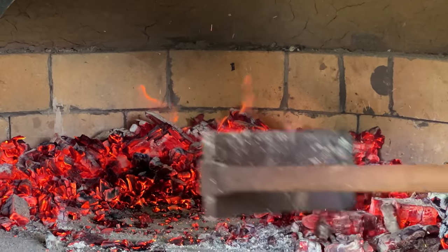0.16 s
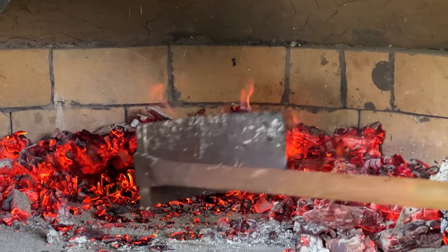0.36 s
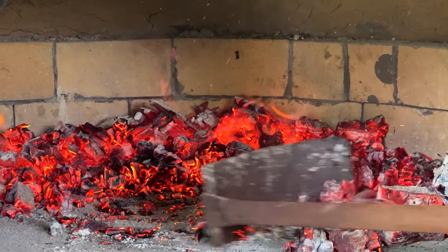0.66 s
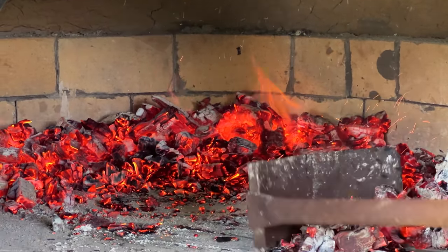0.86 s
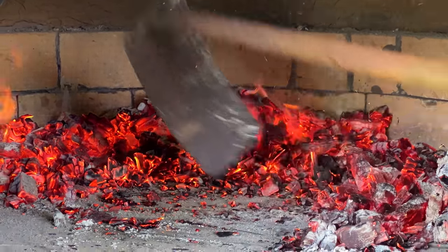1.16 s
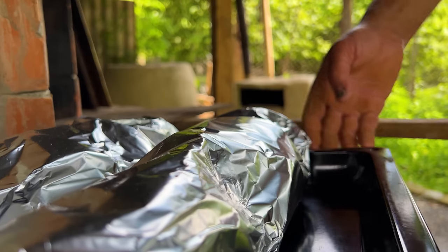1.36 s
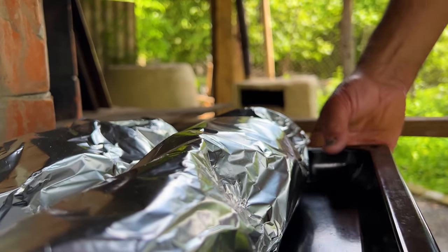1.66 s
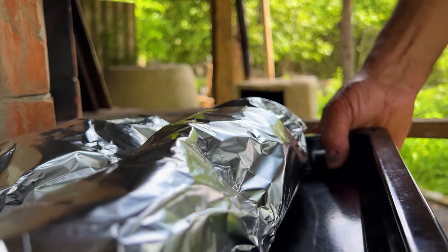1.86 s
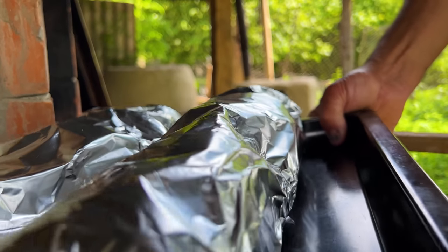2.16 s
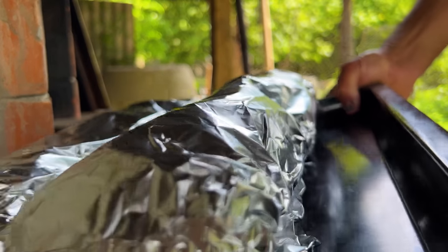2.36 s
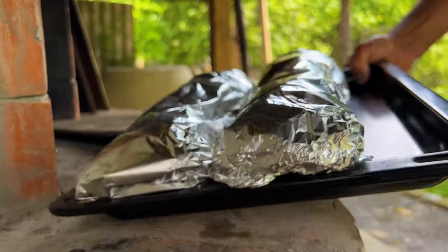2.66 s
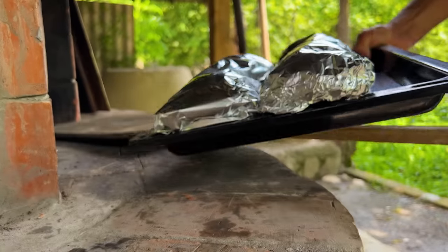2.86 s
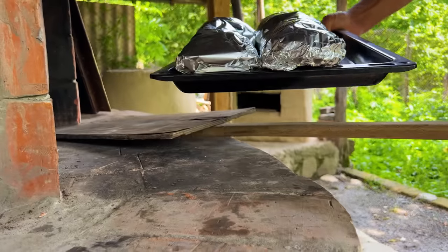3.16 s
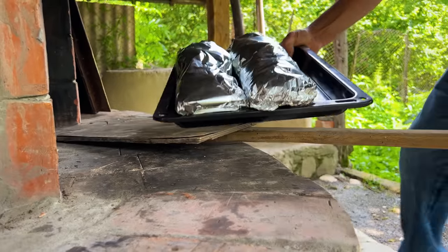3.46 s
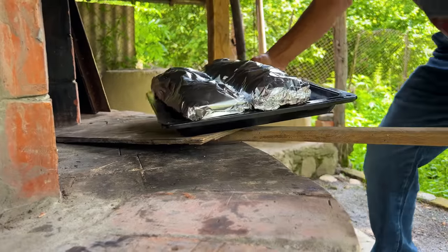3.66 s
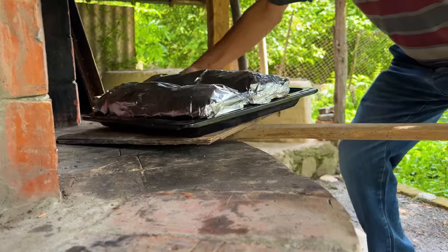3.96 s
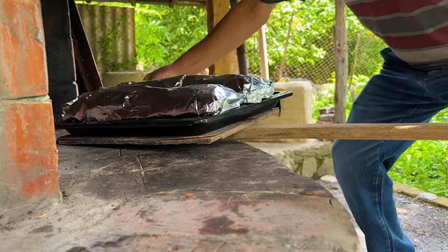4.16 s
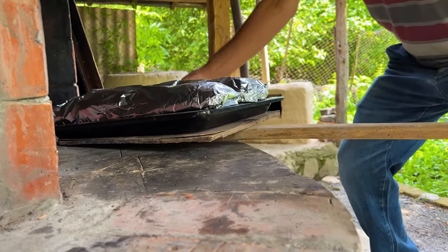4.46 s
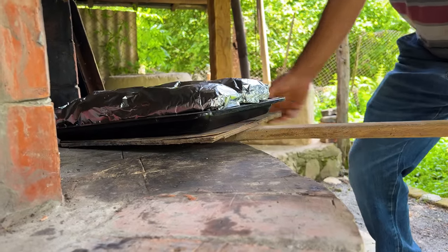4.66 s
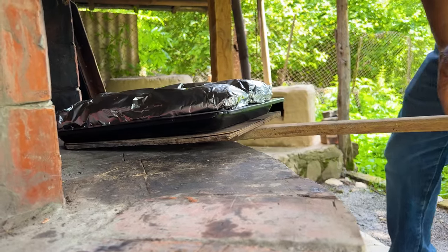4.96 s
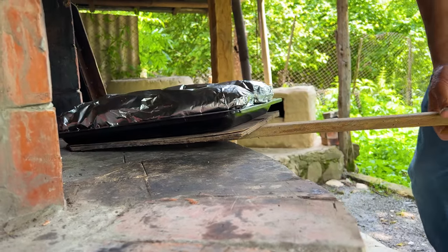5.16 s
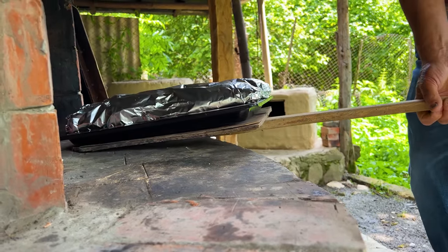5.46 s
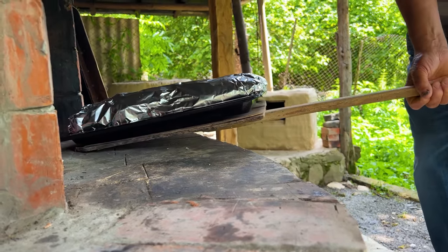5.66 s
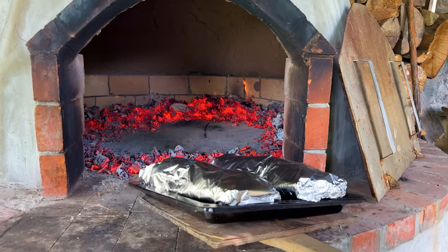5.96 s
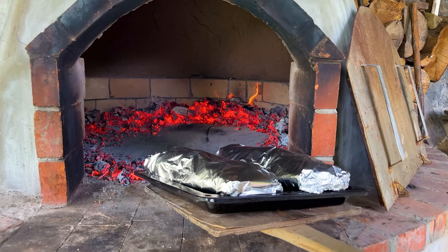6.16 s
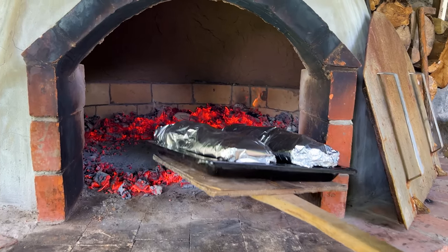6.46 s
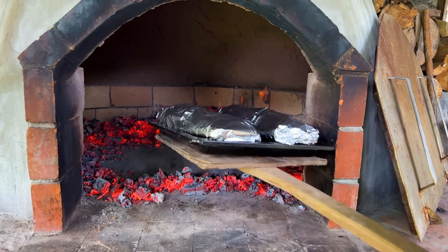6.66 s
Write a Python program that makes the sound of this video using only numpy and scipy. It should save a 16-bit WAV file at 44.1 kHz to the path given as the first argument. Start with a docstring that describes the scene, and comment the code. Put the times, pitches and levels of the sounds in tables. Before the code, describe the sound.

A steel rake scrapes and clinks through embers on the brick floor of an outdoor oven. Foil crinkles lightly, then a loaded baking tray clunks down, drags and grinds over gritty stone with sharp clicks. Softer knocks follow, and a wooden peel slides in a few short strokes. Faint birds chirp over a quiet garden hush, with a little low handling rumble on the microphone.

```python
"""A garden with a wood-fired oven: a steel rake scrapes the bricks, a baking tray is set down and dragged,
then tray and peel grind over gritty stone. Friction and impact excite the normal modes of each body.
Embers and foil tick in short damped bursts, and the load knocks dully on wood and stone.
Birdsong and one short squeak scatter among the trees over a quiet hush. Moving air pushes
the microphone below the range of hearing, and a low rumble swells with handling bumps."""
import sys
import numpy as np
from scipy import signal
from scipy.fft import rfft, irfft, next_fast_len
from scipy.io import wavfile
from scipy.ndimage import uniform_filter1d

SR = 44100
rng = np.random.default_rng(int(sys.argv[2]) if len(sys.argv) > 2 else 0)


def store_wav(level_fs):
    """Save 16-bit WAV to argv[1]."""
    pcm = np.round(np.clip(np.atleast_2d(level_fs), -1, 1) * 32767)
    wavfile.write(sys.argv[1], SR, pcm.T.astype(np.int16))


N = 300321
FFT_SIZE = next_fast_len(N + SR)
TIME_S = np.arange(N) / SR
FREQ_HZ = np.maximum(np.arange(FFT_SIZE // 2 + 1) * SR / FFT_SIZE, 1.)

# Friction strokes, in relative levels: start_s, length_s, first_db, last_db, lead_s, bass_db, treble_db
RAKE_STROKES = [(.53, 0.47, -41.5, -63, 0.026, -17.5, 1), (.69, 0.14, -33, -39, 0.055, -14.5, -2),
                (.96, 0.32, -53.5, -56, 0.058, -17, -14.5)]
TRAY_STROKES = [(1.961, 0.084, -24, -47.5, 0.0082, 6, -72), (2.03, 0.16, -43.5, -48.5, .02, -1, -19.5),
                (2.23, 0.086, -29, -37.5, 0.067, 4.5, -31.5), (2.335, .16, -32.5, -28.5, 0.079, 1, -16.5)]
PEEL_STROKES = [(4.79, 0.23, -40.5, -35, 0.29, -6, -44), (5.14, 0.29, -39.5, -40, 0.13, -6.5, -40),
                (5.52, 0.19, -40, -48, 0.25, -14, -29.5), (5.76, 0.26, -51, -56, 0.11, -14, -68)]
GRIT_STROKES = [(0, 0.094, -37.5, -37.5, .01, -20, -15), (.14, 0.24, -49, -66.5, .02, -12.5, -9),
                (1.2, .15, -50, -51, 0.042, -2, -24), (1.4, 0.22, -59, -55.5, 0.055, -1.5, -12),
                (1.74, 0.077, -36, -45.5, 0.037, 0, -32.5), (1.85, 0.1, -56, -51, .03, -8.5, -13),
                (2.87, .06, -50, -39, .07, -13, -16), (2.94, .46, -29.5, -29.5, .05, -13, -19),
                (3.42, 0.11, -35.5, -41, 0.052, -4, -19.5), (3.6, 0.47, -51.5, -47, .03, 3, -37),
                (4.1, 0.18, -38.5, -38, 0.24, -7, -25), (4.33, 0.074, -54, -51, .05, -14, -12.5)]
# Catches that make the friction jump: time_s, jump_db
EDGE_CATCHES = [(0.528, 11), (0.611, 10), (1.203, 10.5), (1.33, 12.5), (1.738, 5), (1.777, 9.5), (2.234, 7),
                (2.259, 7.5), (2.284, 11.5), (2.351, 3.5), (2.373, 13), (2.408, 8), (2.44, 13), (2.472, 10),
                (2.509, 14), (3.054, 11), (3.265, -3.5), (3.382, -0.5), (3.538, 7.5), (4.14, -4),
                (4.374, 8), (5.201, 1.5), (5.33, 3.5), (5.702, 7), (5.729, 16), (5.75, 0), (6, -3)]
# Normal modes (grit rings briefly all over the middle range): pitch_hz, level_db, t60_s
RAKE_MODES = [(705, -9, .15), (791, -8, .1), (1050, -10, .2), (1200, -9, .2), (1710, -4, .18),
              (2094, -8, .6), (2175, -5, .22), (2585, -6, .13), (3316, -6, .45), (3413, -7, .3),
              (3688, -7, .25), (3795, -10, .1), (4118, -10, .2), (4305, -11, .15), (4425, -9, .15),
              (4875, -5, .3), (5150, -12, .2), (5750, -11, .15), (6051, -10, .12), (6770, -9, .18),
              (7410, -13, .15), (7900, -15, .15), (8430, -15, .15), (9280, -14, .16), (9640, -16, .18),
              (10250, -15, .1), (10750, -17, .12), (11950, -16, .1), (13420, -19, .1)]
PEEL_MODES = [(700, -14, .03), (1250, -6, .015), (1480, -2, .012), (1650, 0, .012), (1880, -4, .2),
              (2040, 2, .08), (2600, -9, .012), (3800, -14, .005), (4340, -11, .015), (8500, -29, .003)]
GRIT_MODES = [(hz, -6 * np.log2(hz / 3100) ** 2, 45 / hz) for hz in 600 * 2 ** (np.arange(19) / 6)]
# Resonances of the tray: pitch_hz, level_db
TRAY_RESONANCES = [(160, 6.5), (215, -1), (253, 4.5), (405, 3), (549, 5), (610, 10.5), (662, 7), (736, 7.5),
                   (875, 1.5), (1165, -11), (1610, 6), (2095, -12), (2200, -16), (2300, 4), (2700, 6),
                   (3300, 1), (3780, -9), (4285, -14), (4730, -14.5), (5005, -44)]
# Blows on steel: start_s, peak_db, centre_hz, width_octaves
RAKE_IMPACTS = [(.16, -44.5, 4030, 0.051), (.531, -27, 2730, 0.28), (.533, -38, 4350, 0.089),
                (.615, -37, 4260, 0.044), (.618, -38, 2590, .05), (.705, -30, 2590, .05),
                (.687, -26.5, 4930, 0.16), (.69, -35, 795, 0.38), (.86, -43, 3330, 0.037),
                (.86, -38, 4940, 0.1), (.947, -38.5, 2109, 0.028), (.947, -42.5, 3430, 0.14)]
TRAY_IMPACTS = [(1.96, -16.5, 736, 0.28), (1.962, -25.5, 544, 0.045), (2.5, -31.5, 160, 0.059),
                (3.88, -52, 420, .15), (4.07, -40, 686, 0.18), (4.125, -35.5, 690, .15),
                (4.145, -31, 2230, 0.039), (4.17, -54.5, 336, 0.074), (4.215, -31.5, 2200, 0.026),
                (4.248, -27.5, 2200, 0.028)]
# Ticks of embers, foil and grit: start_s, peak_db, pitch_hz, snap_db
SHARP_TICKS = [(0.3705, -38, 3900, -45), (1.0653, -63, 2060, -41), (1.2544, -26, 910, -64),
               (1.404, -35.5, 1920, -60), (1.49, -36.5, 1960, -45), (1.568, -39, 4500, -43),
               (1.6423, -38, 3700, -62), (1.6792, -32, 3470, -55), (1.885, -39, 1390, -57),
               (1.9595, -13, 1570, -38), (2.069, -34.5, 3900, -32.5), (2.61, -43, 1840, -82),
               (2.8654, -44, 1080, -58), (2.9198, -22, 2250, -48), (2.9387, -16, 2170, -42),
               (2.9522, -14.5, 1890, -45), (2.995, -19, 3830, -45), (3.0467, -13, 1040, -20),
               (3.0579, -19, 3280, -25), (3.139, -15.5, 3540, -34), (3.1658, -10.5, 2630, -33),
               (3.3383, -20, 3270, -45), (3.3882, -19.5, 1980, -42), (3.4698, -25, 2740, -30),
               (3.5045, -27, 1970, -43), (3.5215, -28, 990, -56), (3.5905, -32.5, 1790, -60),
               (3.6306, -37, 1350, -69), (3.6906, -58, 1060, -64), (3.745, -44, 3600, -58),
               (3.7533, -30, 1230, -66), (3.8, -35, 1700, -66), (3.878, -33, 1030, -66),
               (3.9734, -29.5, 2800, -39.5), (4.817, -30, 1680, -34.5), (4.848, -33, 1600, -55),
               (4.8745, -27.5, 1600, -26.5), (4.9687, -35, 1610, -41), (5.1541, -32.5, 1600, -52),
               (5.28, -36, 1950, -60), (5.6978, -34, 2410, -37), (5.728, -30, 1980, -51),
               (5.74, -35, 3580, -53), (5.752, -31, 2600, -52), (5.89, -46.5, 4130, -59),
               (6.003, -42, 2900, -70), (5.9371, -37, 2920, -62), (5.9594, -68, 6000, -38.5),
               (6.3747, -39, 2800, -37.5), (6.526, -61, 4460, -46.5)]
# Knocks of the load on wood and stone: start_s, peak_db, pitch_hz
DULL_KNOCKS = [(.765, -40, 218), (1.255, -35.5, 295), (1.35, -31, 393), (1.741, -35.5, 82.5),
               (1.779, -29, 368), (1.956, -25.5, 137), (2.499, -30, 160), (3.447, -45, 78.1),
               (3.548, -37, 79), (3.597, -35, 164), (3.884, -43, 163)]
# Spells of small ticks: start_s, length_s, ticks_per_s, typical_peak_db
CRINKLE_SPELLS = [(0.205, .25, 8.7, -50), (1.416, .28, 25, -49), (3.578, .45, 20, -49)]
# Bird notes and one short falling squeak:
# start_s, length_s, first_hz, last_hz, level_db, bend_exponent, flutter_share
WHISTLES = [(.12, .25, 2500, 3130, -55, .5, .03), (.17, .22, 1960, 2040, -63, 1, .03),
            (.25, .2, 3950, 4030, -65, 1, .02), (1.5, .22, 3650, 3860, -62, .25, .01),
            (1.835, .05, 2980, 2580, -47, 1, .01), (3.75, .22, 2330, 2980, -52, .6, .025),
            (4.57, .07, 3500, 3900, -65, .9, .01), (4.62, .16, 3900, 3740, -64, .9, .01),
            (4.87, .15, 2760, 2660, -58, .9, .01), (5.03, .12, 2700, 3450, -48, .9, .012),
            (5.54, .3, 2070, 1930, -62, 2, .012), (5.8, .2, 1900, 1880, -64, 1, .012),
            (5.98, .2, 1880, 1870, -71, 1, .01), (6.01, .19, 3810, 3830, -67, 1, .006),
            (6.16, .165, 3830, 5800, -69, 1.15, .016), (6.19, .12, 2000, 2900, -68, 1.4, .015),
            (6.29, .15, 2900, 2480, -61, .6, .02), (6.43, .085, 2550, 3480, -60, .8, .016),
            (6.5, .05, 3430, 3400, -66, 1, .016)]
# Strength of the air's slow push and of a low rumble with handling bumps: time_s, push_db, rumble_db
PUSH_AND_RUMBLE_LEVELS = [(0.0, -33, -63), (0.97, -35.5, -76), (1.86, -33, -43.5), (2.12, -38, -52.5),
                          (5.29, -33.5, -70.5), (5.63, -45.5, -57), (5.84, -25.5, -65), (6.1, -24.5, -59),
                          (6.2, -28.5, -63.5), (6.64, -25, -67), (6.81, -35.5, -51.5)]
# Strength of the garden hush: time_s, level_db
HUSH_LEVELS = [(0, -67.5), (1.4, -61.5), (2.75, -62), (4.5, -64.5), (6.1, -62.5), (6.81, -63)]
# Spectra of the bare contact, the air's slow push, the rumble and the hush: frequency_hz, density_db
CONTACT_SPECTRUM = [(59, -67.5), (100, -10.5), (287, -18.5), (386, -10.5), (530, -17.5), (601, -8.5),
                    (825, -7.5), (1060, -5), (2580, 0), (4020, -6), (15500, -62)]
PUSH_SPECTRUM = [(3, 9.5), (6, 9.5), (10, 18.5), (16, 19), (24, -0.5), (40, -15), (80, -66.5)]
RUMBLE_SPECTRUM = [(15, -7), (28, 2.5), (45, -1.5), (70, -9), (110, -17), (200, -53)]
HUSH_SPECTRUM = [(40, -4.5), (100, 2), (200, 0), (1000, -13), (2000, -17.5), (3500, -21), (5500, -28.5),
                 (9000, -43.5), (15500, -58)]

TICK_T60_S, KNOCK_T60_S = .019, .16


def rake_scrape():
    """Contact damping: pressed on the bricks, the steel keeps under half of its free ring time."""
    pressed_modes = [(hz, db, .45 * t60) for hz, db, t60 in RAKE_MODES]
    return friction(RAKE_STROKES, pressed_modes, fall_db_per_s=93, bare_db=-2, grain_db=3.5,
                    stutter_db=-.5, patchy_db=4, shift_hz=25.76, drift_share=.0005)


def tray_drag():
    """Plate vibration: sliding friction drives the bending modes of the loaded tray."""
    return friction(TRAY_STROKES, loaded_tray_modes(), fall_db_per_s=359, bare_db=-2, grain_db=3,
                    stutter_db=-1, patchy_db=3.5, shift_hz=16.88, drift_share=.008)


def loaded_tray_modes():
    """Frequency-dependent damping: under the load, higher modes decay sooner."""
    return [(hz, db, min(.18 * (600 / hz) ** 1.4, .35)) for hz, db in TRAY_RESONANCES]


def peel_slide():
    """Damped resonance: stone rubs the peel, whose mostly short-lived modes give broad peaks."""
    return friction(PEEL_STROKES, PEEL_MODES, fall_db_per_s=153, bare_db=-2, grain_db=3.5,
                    stutter_db=1.5, patchy_db=2, shift_hz=18, drift_share=.01)


def grit_grind():
    """Roughness noise: on loose grit the bare contact outweighs the brief ringing."""
    return friction(GRIT_STROKES, GRIT_MODES, fall_db_per_s=314, bare_db=7.5, grain_db=3.5,
                    stutter_db=2, patchy_db=5.5, shift_hz=30.38, drift_share=.05)


def friction(strokes, modes, fall_db_per_s, bare_db, grain_db, stutter_db, patchy_db, shift_hz,
             drift_share):
    """Forced vibration: rubbing drives modes whose strength and pitch vary as the contact shifts."""
    pressure, bass_db, treble_db = stroke_envelopes(strokes, fall_db_per_s)
    bare_force, modal_force = contact_forces(grain_db, stutter_db) * pressure
    out = undb(bare_db) * contact_noise(bare_force, bass_db, treble_db)
    force_slope = signal.lfilter([.5, 0, -.5], 1, modal_force)
    span = slice(max(int((strokes[0][0] - .3) * SR), 0), min(int((strokes[-1][0] + .7) * SR), N))
    count = span.stop - span.start
    total_power = sum(undb(db) ** 2 / t60 for _, db, t60 in modes) * np.log(1000) / SR
    usual_bass_db, usual_treble_db = np.median(np.array(strokes)[:, -2:], axis=0)
    for hz, db, t60 in modes:
        # Low modes follow the stroke's bass, high modes its treble.
        tilt_db = (hz < 1000) * (bass_db - usual_bass_db) + (hz > 4500) * (treble_db - usual_treble_db)
        drive = force_slope[span] * undb(db + tilt_db[span] + patchy_db * wander(shift_hz, count))
        pitch_hz = hz * (1 + drift_share * wander(shift_hz / 2, count))
        phasor = np.exp(2j * np.pi * np.cumsum(pitch_hz) / SR)
        # A one-pole low-pass in a frame that turns with the mode acts as a resonator.
        pole = decay(1 / SR, t60)
        ring = (signal.lfilter([1 - pole], [1, -pole], drive * phasor.conj()) * phasor).imag
        out[span] += 2 * ring / np.sin(2 * np.pi * hz / SR) / np.sqrt(total_power)
    return out


def stroke_envelopes(strokes, fall_db_per_s, swell_db=30):
    """Power addition: strokes swell, hold a slope and die away; the loudest sets bass and treble."""
    total_power, bass, treble = 1e-14, 0, 0
    for start_s, length_s, first_db, last_db, lead_s, bass_db, treble_db in strokes:
        level_db = np.interp(TIME_S, [start_s, start_s + length_s], [first_db, last_db])
        level_db -= swell_db * np.maximum(start_s - TIME_S, 0) / lead_s
        level_db -= fall_db_per_s * np.maximum(TIME_S - start_s - length_s, 0)
        power = undb(level_db) ** 2
        total_power += power
        bass += power * bass_db
        treble += power * treble_db
    return np.sqrt(total_power), bass / total_power, treble / total_power


def contact_forces(grain_db, stutter_db, catch_rise_s=.004, catch_t60_s=.094):
    """Rough contact: uneven grains drive hiss and ringing; pressure stutters and jumps at catches."""
    jump = 1
    for time_s, jump_db in EDGE_CATCHES:
        rise = np.clip((TIME_S - time_s) / catch_rise_s + .5, 0, 1)
        jump += rise * undb(jump_db) * decay(np.maximum(TIME_S - time_s, 0), catch_t60_s)
    grains = rng.standard_normal((2, N)) * undb(grain_db * np.minimum(rng.exponential(size=N), 6))
    return jump * unit(grains * undb(stutter_db * wander(70)))


def contact_noise(force, bass_db, treble_db):
    """Direct radiation: the bare contact is heard as broadband noise in three bands."""
    spectrum = minimum_phase(CONTACT_SPECTRUM)
    lowpass = 1 / (1 + 1j * FREQ_HZ / 800) ** 2
    highpass = 1 / (1 + 4500 / (1j * FREQ_HZ)) ** 2
    low_cut = 1 / (1 + 170 / (1j * FREQ_HZ)) ** 2
    bass = filtered(force * undb(bass_db), unit(spectrum * lowpass * low_cut))
    middle = filtered(force, unit(spectrum * (1 - lowpass) * (1 - highpass)))
    treble = filtered(force * undb(treble_db), unit(spectrum * highpass))
    return bass + middle + treble


def steel_impacts(impacts, modes, rise_s=.001):
    """Free vibration: each blow favours the modes near its centre frequency, which then decay."""
    hz, mode_db, t60 = np.transpose(modes)[:, :, None]
    t, out = TIME_S[:SR], np.zeros(N)
    rings = undb(mode_db) / t60 * decay(t, t60) * np.sin(2 * np.pi * hz * t) * np.minimum(t / rise_s, 1)
    for start_s, peak_db, centre_hz, width_octaves in impacts:
        chance_db = 1.5 * rng.standard_normal(len(modes))
        rolloff_db = 6 * (np.log2(hz[:, 0] / centre_hz) / width_octaves) ** 2
        clang = undb(chance_db - rolloff_db) @ rings
        onset = int(start_s * SR)
        out[onset:onset + SR] += undb(peak_db) * clang / np.abs(clang).max()
    return out


def bursts(events, t60_s):
    """Damped transients: a tick or knock is a band of decaying noise, with a treble snap if listed."""
    t = TIME_S[:8192]
    out = np.zeros(N + len(t))
    for start_s, peak_db, hz, *snap_db in events:
        pulse = (rng.standard_normal(len(t)) + 4 * (t == 0)) * decay(t, t60_s)
        body = signal.lfilter(*signal.butter(2, [hz / 1.4, hz * 1.4], "bandpass", fs=SR), pulse)
        snap = signal.lfilter(*signal.butter(1, [4500, 14000], "bandpass", fs=SR), pulse)
        onset = int(start_s * SR)
        out[onset:onset + len(t)] += undb(peak_db) * body / np.abs(body).max()
        out[onset:onset + len(t)] += undb(snap_db).sum() * snap / np.abs(snap).max()
    return out[:N]


def crinkles(centre_hz=2210, spread_db=4, snap_db=-23, candidates=40):
    """A random point process: small ticks fall at chance moments within each spell."""
    ticks = []
    for start_s, length_s, ticks_per_s, typical_db in CRINKLE_SPELLS:
        delays_s = candidates * rng.random(candidates) / ticks_per_s
        peaks_db = typical_db + spread_db * rng.standard_normal(candidates)
        pitches_hz = centre_hz * 1.5 ** np.clip(rng.standard_normal(candidates), -2, 2)
        for delay_s, peak_db, hz in zip(delays_s, peaks_db, pitches_hz):
            if delay_s < length_s:
                ticks.append((start_s + delay_s, peak_db, hz, peak_db + snap_db))
    return bursts(ticks, TICK_T60_S)


def birds_and_squeak(fade_s=.02):
    """Frequency modulation: fast flutter makes gliding whistles hoarse; the trees smear them."""
    out, flutter = 0, wander(700)
    for start_s, length_s, first_hz, last_hz, level_db, bend, flutter_share in WHISTLES:
        age_s = TIME_S - start_s
        fade = np.clip(np.minimum(age_s, length_s - age_s) / fade_s, 0, 1)
        glide = np.clip(age_s / length_s, 0, 1) ** bend  # a bend under 1 slides early, over 1 late
        pitch_hz = (first_hz + (last_hz - first_hz) * glide) * (1 + flutter_share * flutter)
        out += 2 ** .5 * fade * undb(level_db) * np.sin(2 * np.pi * np.cumsum(pitch_hz) / SR)
    return filtered(out, reverberation(t60_s=.3, direct_db=-4))


def push_and_rumble():
    """Infrasound: moving air pushes the microphone, beneath a low rumble with handling bumps."""
    time_s, push_db, rumble_db = np.transpose(PUSH_AND_RUMBLE_LEVELS)
    push = unit(filtered(rng.standard_normal(N), minimum_phase(PUSH_SPECTRUM)))
    push /= np.sqrt(uniform_filter1d(push ** 2, size=SR // 4) + .96)  # evens out chance swells
    push *= undb(np.interp(TIME_S, time_s, push_db))
    rumble = unit(filtered(rng.standard_normal(N), minimum_phase(RUMBLE_SPECTRUM)))
    return push + undb(np.interp(TIME_S, time_s, rumble_db)) * rumble


def garden_hush():
    """Ambient noise: a quiet, dark hush whose uneven amplitude gives a faint crackle."""
    crackle = rng.standard_normal(N) * undb(2.6 * rng.exponential(size=N) + 1.7 * wander(8.8))
    level_db = np.interp(TIME_S, *np.transpose(HUSH_LEVELS))
    return undb(level_db) * filtered(unit(crackle), unit(minimum_phase(HUSH_SPECTRUM)))


def reverberation(t60_s, direct_db):
    """Scattering: the frequency response of a direct sound followed by fading echoes."""
    echoes = unit(rng.standard_normal(SR) * decay(TIME_S[:SR], t60_s)) / np.sqrt(SR)
    echoes[0] += undb(direct_db)
    return unit(rfft(echoes, FFT_SIZE))


def minimum_phase(spectrum):
    """Causality: folding the cepstrum gives a causal response through the spectrum's points."""
    hz, db = np.transpose(spectrum)
    gain_db = np.interp(np.log(FREQ_HZ), np.log(hz), db)
    cepstrum = irfft(np.log(undb(gain_db)), FFT_SIZE)
    cepstrum[1:FFT_SIZE // 2] *= 2
    cepstrum[FFT_SIZE // 2 + 1:] = 0
    return np.exp(rfft(cepstrum))


def filtered(x, response):
    """Convolution, as a product of spectra."""
    return irfft(rfft(x, FFT_SIZE) * response, FFT_SIZE)[:N]


def wander(rate_hz, count=N):
    """Low-pass noise: random steps, smoothed twice, at unit RMS."""
    hold = int(SR / rate_hz)
    steps = np.repeat(rng.standard_normal(count // hold + 1), hold)
    return unit(uniform_filter1d(uniform_filter1d(steps, hold), hold)[:count])


def decay(time_s, t60_s):
    """Exponential decay, by 60 dB in t60_s."""
    return 1000. ** (-time_s / t60_s)


def undb(db):
    """Amplitude ratio of a level in decibels."""
    return 10 ** (np.asarray(db, float) / 20)


def unit(x):
    """Normalisation to unit RMS."""
    return x / np.sqrt(np.mean(np.abs(x) ** 2))


def scene():
    """Superposition: the sounds at the oven, with brief echoes, add to the background."""
    oven = undb(-4.5) * rake_scrape() + undb(-6.5) * tray_drag()
    oven += undb(-9) * peel_slide() + undb(-10) * grit_grind()
    oven += steel_impacts(RAKE_IMPACTS, RAKE_MODES) + steel_impacts(TRAY_IMPACTS, loaded_tray_modes())
    oven += bursts(SHARP_TICKS, TICK_T60_S) + bursts(DULL_KNOCKS, KNOCK_T60_S) + crinkles()
    oven = filtered(oven, reverberation(t60_s=.16, direct_db=10.6))
    return (oven + birds_and_squeak() + garden_hush() + push_and_rumble())[None]


def record(dry):
    """Band limiting: the microphone path cuts steeply above 15850 Hz."""
    return signal.sosfilt(signal.ellip(10, .2, 80, 15850, fs=SR, output="sos"), dry)


dry = scene()
out = record(dry)
store_wav(out)
```